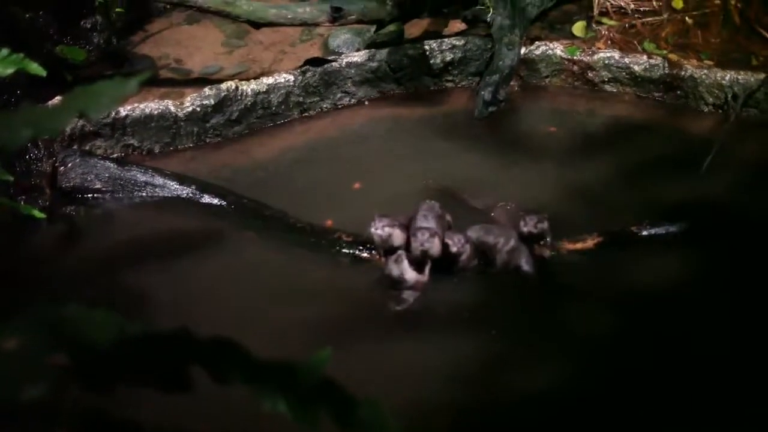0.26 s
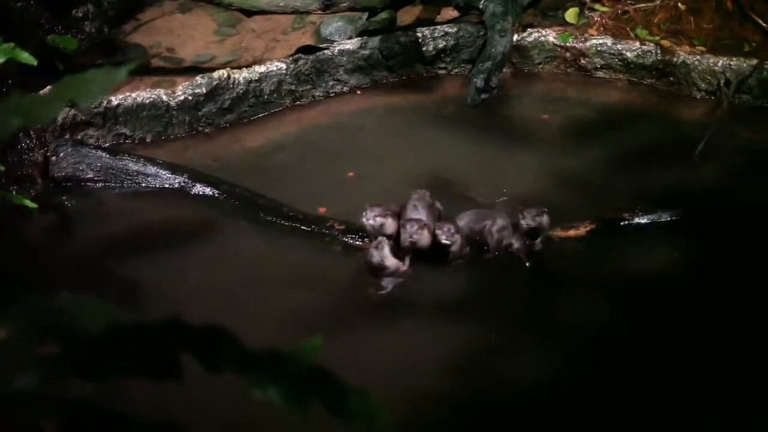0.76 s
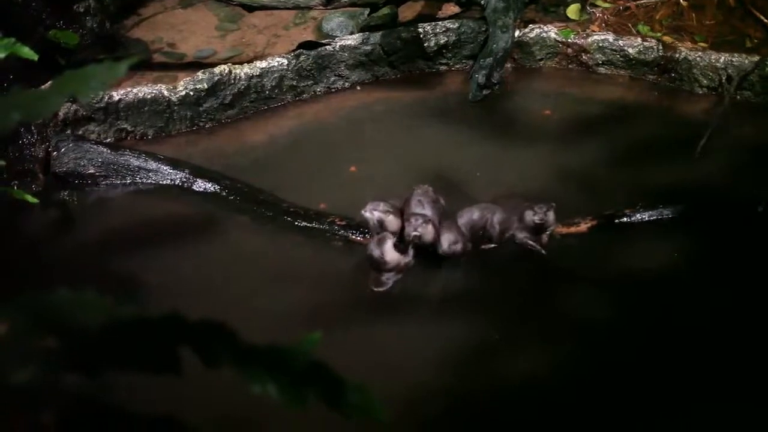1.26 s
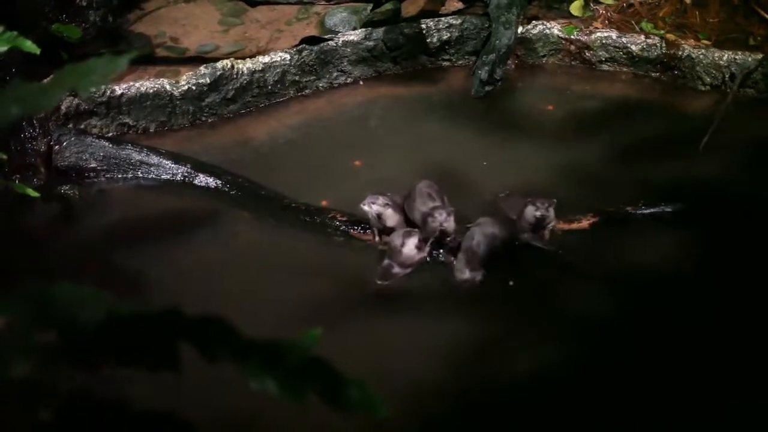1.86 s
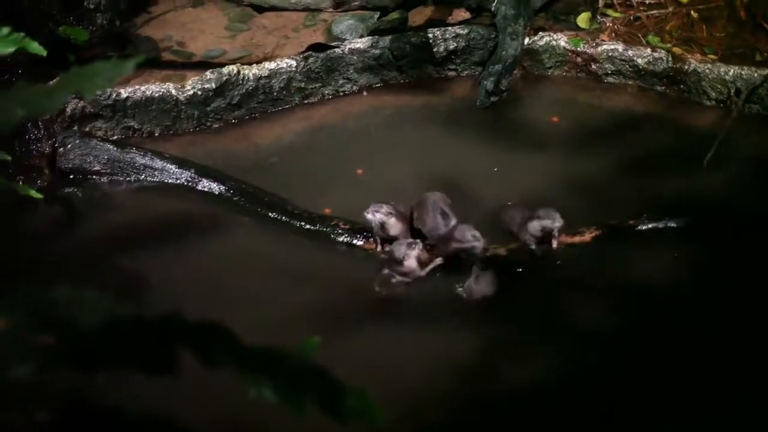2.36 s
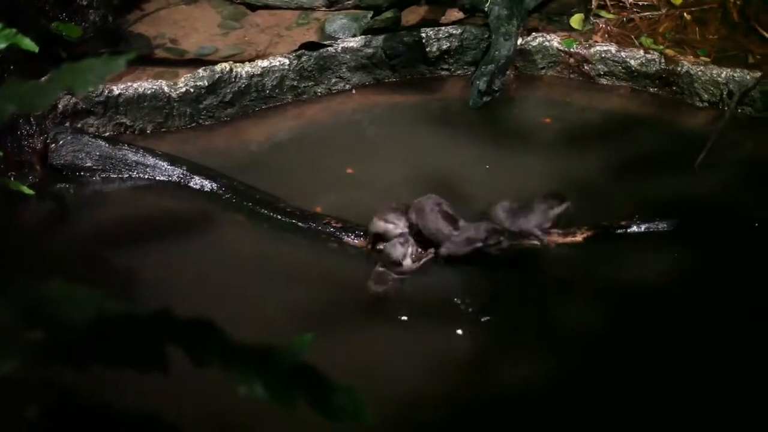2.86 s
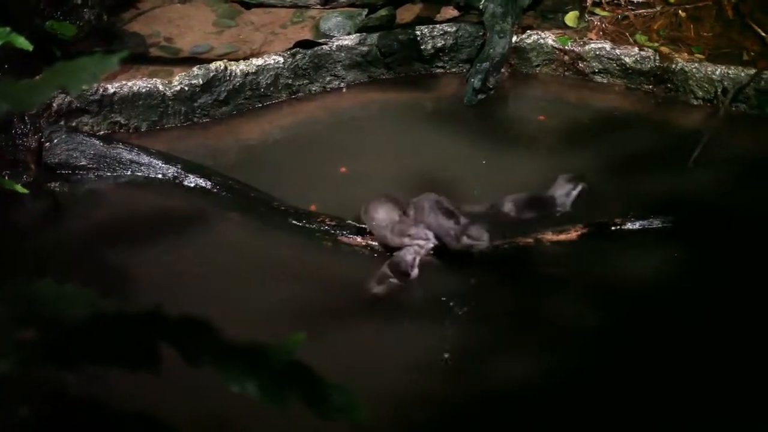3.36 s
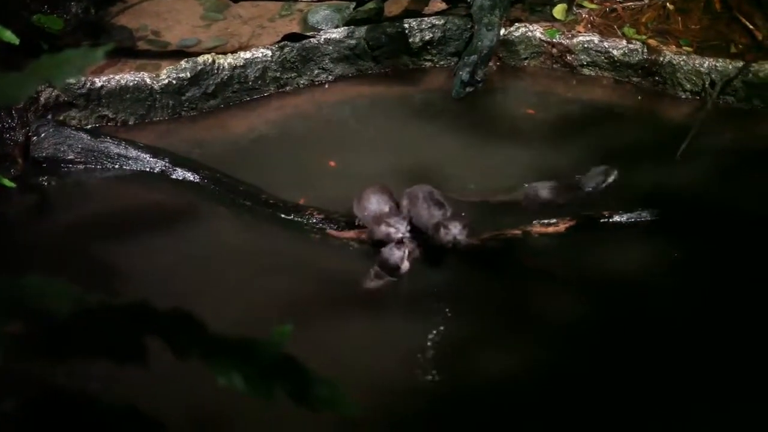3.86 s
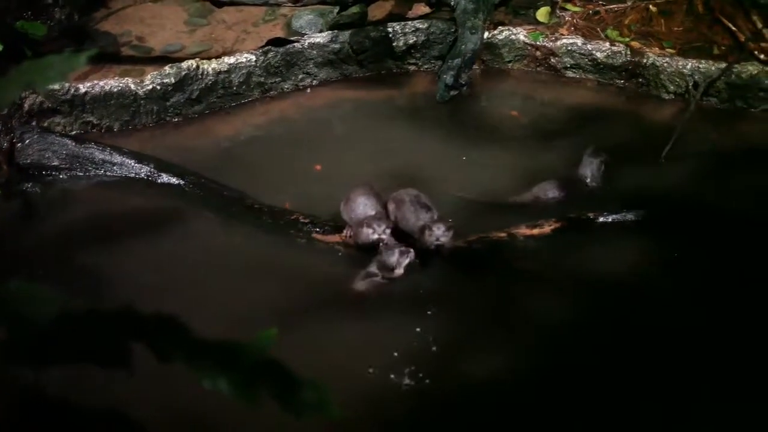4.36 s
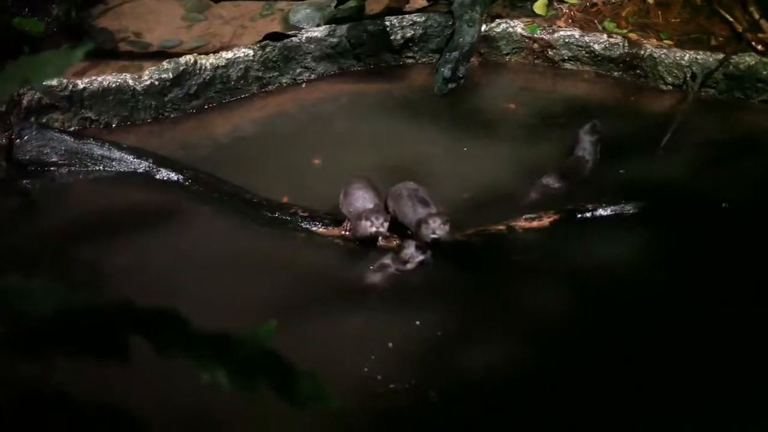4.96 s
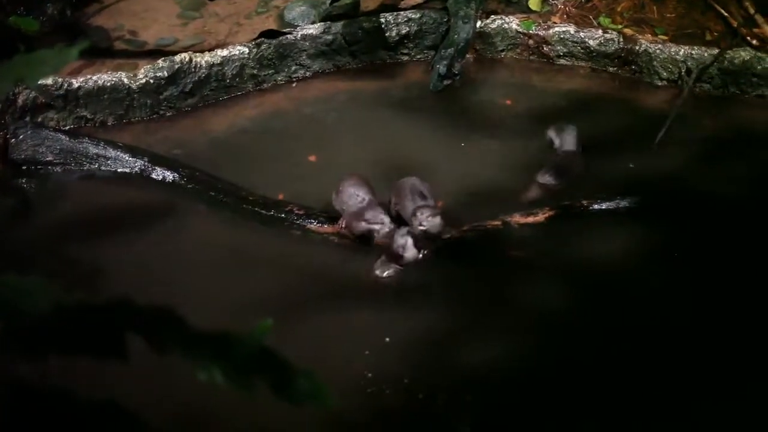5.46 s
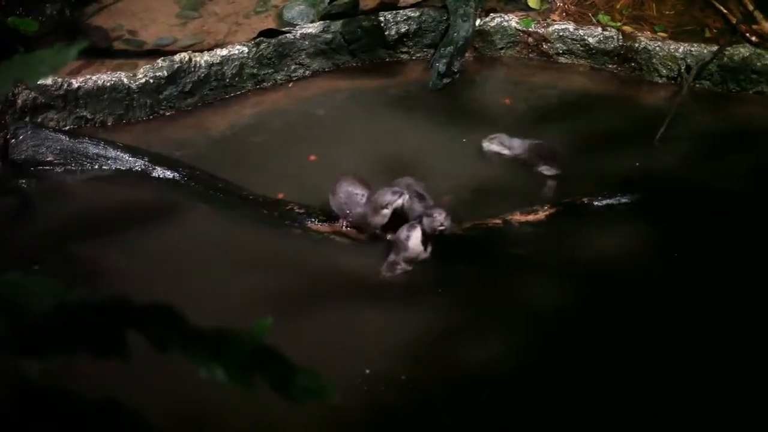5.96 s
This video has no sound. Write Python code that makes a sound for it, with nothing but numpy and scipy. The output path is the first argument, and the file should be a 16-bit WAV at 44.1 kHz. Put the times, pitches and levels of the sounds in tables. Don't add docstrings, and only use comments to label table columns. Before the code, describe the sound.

Otters squeal, whistle and growl in overlapping bursts over a steady high insect hiss, with small water drops and short pond echoes.

```python
import sys
import numpy as np
from scipy import signal
from scipy.io import wavfile
from scipy.ndimage import uniform_filter1d

SR = 44100
rng = np.random.default_rng(int(sys.argv[2]) if len(sys.argv) > 2 else 0)


def waveform_to_disk(signal):
    frames = np.transpose(np.atleast_2d(signal))
    scaled = np.clip(frames, -1, 1) * 32767
    samples = np.round(scaled).astype(np.int16)
    wavfile.write(sys.argv[1], SR, samples)


def invert_db(x):
    u = np.asarray(x, float) / 20
    return 10 ** u


N = 274302


def evened(x):
    return x / np.sqrt(np.mean(abs(x) ** 2) + 1e-20)


def read(points, hz):
    f, value = np.transpose(points)
    return np.interp(np.log(hz + 1), np.log(f + 1), value)


def add(mix, s, sound):
    part = mix[round(s * SR):][:len(sound)]
    part += sound[:len(part)]


def wander(shape, samples):
    noise = uniform_filter1d(rng.standard_normal(shape), int(samples))
    return evened(uniform_filter1d(noise, int(samples)))


def fuzzy_tone(hz, width, db):
    r = np.exp(-np.pi * width / SR)
    white = rng.standard_normal(N) + 1j * rng.standard_normal(N)
    slow = signal.lfilter([1], [1, -2 * r, r * r], white)
    carrier = np.exp(2j * np.pi * hz * np.arange(N) / SR)
    return invert_db(db) * evened((slow * carrier).real)


# (frequency [Hz], density [dB per Hz])
NIGHT_SPECTRUM = [(15, -51), (25, -35.5), (93, -4.5), (290, -9.5), (560, -12), (850, -10.5), (1800, -11.5),
                  (3400, -11.5), (5300, -10.5), (6750, -1.5), (9500, -20), (12000, -35), (15700, -39.5),
                  (17000, -88.5)]
# (frequency [Hz], width [Hz], level [dB])
INSECTS = (6800, 440, -44)
PUMP_HUM = (93, 9, -58)
# (time [s], gain change [dB])
GAIN_DUCKS = [
    (.63, 1.5),
    (1.103, -16.5),
    (2.166, -7.5),
    (3.356, -9.5),
    (5.224, -10.5),
]
HISS_DB, DUCK_S, RECOVER_S = -39.5, .035, 0.73


def night():
    frames, hz = N // 256 + 5, np.fft.rfftfreq(1024, 1 / SR)
    a, b, patches = rng.standard_normal((frames, 513, 3)).T
    patches = evened(uniform_filter1d(uniform_filter1d(patches, 12, 0), 10, 1))
    z = (a + 1j * b) * invert_db(read(NIGHT_SPECTRUM, hz)[:, None] + 1.24 * patches)
    hiss = invert_db(HISS_DB) * evened(signal.istft(z, nperseg=1024, noverlap=768)[1][:N])
    insects = fuzzy_tone(*INSECTS) * invert_db(2.6 * wander(N, 150))
    duck_s, duck_db = np.transpose(GAIN_DUCKS)
    since = np.arange(N) / SR - duck_s[:, None]
    ducks = np.clip(since / DUCK_S + .5, 0, 1) * np.exp(-np.maximum(since, 0) / RECOVER_S)
    return (hiss + insects + fuzzy_tone(*PUMP_HUM)) * invert_db(duck_db @ ducks)


# (time [s], peak level [dB], frequency [Hz], t60 [s])
DROPS = [(.01, -34, 1650, 0.036), (0.04, -19, 1670, 0.02), (.051, -19, 1500, 0.0062),
         (0.353, -23.5, 3860, 0.012), (.369, -28, 1710, 0.0094), (0.477, -23, 6650, 0.015),
         (1.557, -62, 1500, 0.012), (2.055, -38.5, 1360, 0.06), (3.036, -32, 1400, 0.018),
         (4.062, -28, 1590, .026), (4.092, -33, 1640, .025), (4.137, -36.5, 833, 0.064),
         (4.441, -36, 8100, 0.013), (5.002, -27.5, 1800, 0.018)]


def drops():
    mix, t = np.zeros(N), np.arange(3000) / SR
    for s, db, hz, t60 in DROPS:
        ring = np.sin(2 * np.pi * hz * t * (1 + 2.7 * t))
        ring = ring * invert_db(-60 * t / max(t60, .005)) * np.minimum(t / 0.00033, 1)
        tick = 0.13 * rng.standard_normal(len(t)) * invert_db(-60 * t / 0.014)
        add(mix, s, invert_db(db) * (ring + tick))
    return mix


# (frequency [Hz], t60 [s])
POND_DECAY = [(500, 0.039), (2000, 0.27), (3500, 0.76), (5000, 0.75), (9000, 0.044)]


def pond(x):
    taps = np.zeros(SR // 2)
    at = np.arange(300, SR // 2 - 20, 20)
    taps[at + rng.integers(0, 20, len(at))] = rng.choice([-1., 1.], len(at))
    hz, t, z = signal.stft(taps, SR, nperseg=256)
    decay = invert_db(-60 * t / read(POND_DECAY, hz)[:, None])
    tail = signal.istft(z * decay, SR, nperseg=256)[1]
    return signal.fftconvolve(x, tail / np.linalg.norm(tail))[:N]


def throat(modes, hz, mouth):
    return sum(invert_db(db) / (1 + 2j * (hz - f * mouth) / width) ** 2 for f, width, db in modes)


# (frequency [Hz], level [dB])
MICROPHONE = [(20, -3.5), (8150, 1.5), (8500, -9), (10000, -13.5), (12000, -36), (16000, -36)]


def voice(rough, rows, modes, top_hz, jitter, thin_db, rise_s, falter_db, flutter_s=.0003):
    s, *columns = np.transpose(rows)
    t = np.arange(s[0], s[-1], 1 / SR)
    hz, level_db, mouth, tilt_db = (np.interp(t, s, c) for c in columns)
    hz = uniform_filter1d(hz, 500, mode="nearest")
    order = np.arange(1, top_hz // hz.min() + 1)[:, None]
    turns = np.cumsum(hz * (1 + jitter * wander(len(t), 105))) / SR
    over_hz = order * hz[::8]
    slope_db = tilt_db[::8] * np.log2(over_hz / 3000) - thin_db * np.maximum(order - 2, 0)
    colour = throat(modes, over_hz, mouth[::8]) * invert_db(slope_db + read(MICROPHONE, over_hz))
    colour = colour * (over_hz < top_hz)
    power = (abs(colour) ** 2).sum(0) / 2
    colour = colour / np.sqrt(uniform_filter1d(power, 220, mode="nearest"))
    rough = np.clip(rough * (over_hz / 3000) ** .7 * (hz.max() / hz[::8]) ** 1.1, 0, 1)
    patches = evened(uniform_filter1d(wander(colour.shape, 110), size=2, axis=0))
    colour = colour * invert_db(falter_db * patches)
    colour, rough = (np.repeat(c, 8, axis=1)[:, :len(t)] for c in (colour, rough))
    flutter_samples = max(SR / hz.mean() / 1.6, SR * flutter_s) + 2
    smear = wander((2, len(order), len(t)), flutter_samples)
    folds = np.sqrt(1 - rough ** 2) + rough * (smear[0] + 1j * smear[1]) / np.sqrt(2)
    sound = (colour * folds * np.exp(2j * np.pi * order * turns)).real.sum(0)
    edge = np.clip(np.minimum(t - s[0], (s[-1] - t) / 3) / rise_s, 0, 1)
    return s[0], invert_db(level_db) * edge * sound


def chorus(calls, modes, **folds):
    mix = np.zeros(N)
    for rough, rows in calls:
        add(mix, *voice(rough, rows, modes, **folds))
    return mix


SHUT_PER_OCTAVE, BRIGHTER_DB = 0.039, 2.5


def pressed(rows, rough, mouth, tilt_db):
    s, hz, db = np.transpose(rows)
    fall = np.log2(hz.max() / hz)
    mouth, tilt_db = mouth - SHUT_PER_OCTAVE * fall, tilt_db + BRIGHTER_DB * fall
    return rough, np.transpose([s, hz, db, mouth, tilt_db])


# (time [s], pitch [Hz], level [dB])
PEEP = [(0.082, 1040, -30), (0.11, 1019, -28), (0.17, 1258, -24.5), (0.198, 1280, -21.5),
        (0.236, 1256, -26.5), (0.248, 1190, -52)]
# (roughness [0-1], mouth opening [factor], tilt [dB per octave])
PEEP_VOICE = (0.037, 1.01, -0.38)
# (frequency [Hz], width [Hz], level [dB])
PEEP_THROAT = [(1250, 460, 1), (2310, 105, 1.5), (2590, 110, -14), (3404, 120, 6.5), (3770, 160, -10),
               (4280, 420, -1.5)]


def peep():
    return chorus([pressed(PEEP, *PEEP_VOICE)], PEEP_THROAT,
                  top_hz=9000, jitter=.002, thin_db=.1, rise_s=.002, falter_db=1.2)


def glide(start, length, top_hz, end_hz, db, steady, bend, peak, start_db, end_db):
    u = np.linspace(0, 1, 25)
    hz = top_hz + (end_hz - top_hz) * (steady * u + (1 - steady) * u ** bend)
    level_db = db + np.interp(u, [0, peak, 1], [start_db, 0, end_db])
    return np.transpose([start + length * u, hz, level_db])


def glides(rows, shape, tone):
    return [pressed(glide(*row, *shape), *tone) for row in rows]


# (frequency [Hz], width [Hz], level [dB])
THROAT = [(1680, 320, -12), (2950, 600, 0), (5050, 900, 2), (6500, 650, -4), (7800, 1000, -8),
          (10000, 1500, -15)]
# (time [s], pitch [Hz], level [dB], tilt [dB per octave])
WHISTLE = [(0.535, 3504, -40, 6), (0.558, 3669, -20.5, 27), (0.579, 3696, -13.5, 28),
           (0.63, 3326, -12.5, 8), (0.654, 3080, -23, 2), (0.668, 2472, -23, 0.5),
           (0.681, 2207, -17.5, -11.5), (0.703, 2020, -33.5, -12), (0.741, 1420, -22.5, 11)]
WHISTLE_VOICE = (0.057, 0.897)
# (start [s], length [s], top pitch [Hz], end pitch [Hz], level [dB])
HUSKS = [
    (2.5, 0.17, 2800, 2650, -28),
    (4.12, 0.25, 3550, 3350, -40),
    (0.31, 0.051, 5100, 5500, -30.5),
    (3.04, 0.3, 5600, 5250, -30),
    (2.69, 0.22, 5400, 4700, -30.5),
]
PIPS = [
    (.553, 0.039, 3066, 2650, -23),
    (.665, .095, 1224, 600, -43),
    (1.285, 0.057, 2515, 1934, -31),
    (3.35, 0.12, 1005, 693, -46.5),
    (4.208, .08, 2520, 1910, -36),
    (4.235, .095, 1077, 790, -37),
]
PLUNGES = [
    (2.31, 0.078, 3110, 1878, -29.5),
    (3.16, 0.16, 3820, 1876, -22),
    (4.06, 0.17, 3670, 2150, -22),
]
RASPS = [
    (.695, 0.1, 2450, 2215, -29),
    (1.34, .1, 1126, 823, -42),
    (4.203, 0.11, 2440, 1813, -30.5),
]
# (steady droop [0-1], bend [power], peak [0-1 of length], start [dB], end [dB])
HUSK_SHAPE = (-0.56, 0.9, 0.2, -9, -11)
PIP_SHAPE = (-0.1, 0.94, 1, -7, -12)
PLUNGE_SHAPE = (.16, 4.5, .4, -10, -20)
RASP_SHAPE = (-0.6, 1, 0.34, -3, -15)
# (roughness [0-1], mouth opening [factor], tilt [dB per octave])
HUSK_VOICE = (.8, 1.01, -10)
PIP_VOICE = (0.12, 0.54, -18)
PLUNGE_VOICE = (0.15, 0.97, 2)
RASP_VOICE = (.6, .97, 9)


def whistles():
    husks = chorus(glides(HUSKS, HUSK_SHAPE, HUSK_VOICE), THROAT, top_hz=12500, jitter=.012,
                   thin_db=5., rise_s=.02, falter_db=1.2, flutter_s=.0016)
    rough, mouth = WHISTLE_VOICE
    calls = [(rough, np.insert(np.array(WHISTLE), 3, mouth, axis=1))]
    calls += glides(PIPS, PIP_SHAPE, PIP_VOICE)
    calls += glides(PLUNGES, PLUNGE_SHAPE, PLUNGE_VOICE)
    calls += glides(RASPS, RASP_SHAPE, RASP_VOICE)
    return husks + chorus(calls, THROAT, top_hz=12500, jitter=.008, thin_db=5., rise_s=.008, falter_db=3.2)


# (time [s], pitch [Hz], level [dB])
SQUEALS = [
    [(0.812, 873, -44.5), (0.83, 1405, -31), (0.84, 1595, -35.5), (0.876, 1079, -22.5), (0.938, 911, -29.5),
     (1.024, 768, -27.5), (1.09, 775, -27.5)],
    [(1.038, 1663, -19), (1.058, 1661, -12.5), (1.098, 1517, -12.5), (1.122, 1365, -18.5),
     (1.146, 1166, -26), (1.234, 692, -32), (1.262, 657, -43), (1.31, 595, -27)],
    [(2.124, 1624, -13), (2.136, 1619, -19), (2.178, 1637, -13.5), (2.219, 1424, -17.5), (2.233, 1282, -19),
     (2.291, 919, -24), (2.361, 628, -29), (2.4, 591, -26)],
    [(3.297, 1700, -25), (3.305, 1620, -17.5), (3.35, 1335, -14), (3.372, 1246, -20), (3.431, 924, -20.5),
     (3.537, 652, -27), (3.555, 610, -29.5), (3.63, 558.4, -45)],
]
# (time [s], pitch [Hz], level [dB])
ARCHED_SQUEAL = [(5.01, 678, -43), (5.06, 771, -24), (5.1, 1039, -22), (5.135, 1424, -15.5),
                 (5.164, 1359, -14.5), (5.195, 1430, -12), (5.229, 1165, -17.5), (5.33, 788, -21),
                 (5.49, 551, -36)]
# (mouth opening [factor], tilt [dB per octave])
SQUEAL_VOICES = [(.92, -4), (1.01, -2), (1.01, -2), (.99, 1.5), (1.01, 2)]
SQUEAL_ROUGH = (.2, .05, .05, .08, .06)


def squeals():
    curves = SQUEALS + [ARCHED_SQUEAL]
    calls = [pressed(c, rough, *tone) for c, rough, tone in zip(curves, SQUEAL_ROUGH, SQUEAL_VOICES)]
    return chorus(calls, THROAT, top_hz=11200, jitter=.006, thin_db=.1, rise_s=.003, falter_db=3.2)


# (time [s], pulse rate [Hz], level [dB])
GROWLS = [
    [(2.29, 328, -31.5), (2.5, 282, -26.5), (2.64, 280, -29), (2.74, 240, -29)],
    [(5.36, 367, -21), (5.49, 290, -22.5), (5.836, 236, -23.5), (5.96, 268, -20.5), (6.1, 243, -25.5),
     (6.3, 287, -12)],
]
# (mouth opening [factor], tilt [dB per octave])
GROWL_VOICES = [(0.929, 1), (1.011, 0.5)]
GROWL_ROUGH = (.45, .32)
# (frequency [Hz], width [Hz], level [dB])
GROWL_THROAT = [(3120, 473, -2), (3710, 670, -5.5), (4850, 1020, 1.5), (5620, 810, -2.5),
                (7750, 1290, -4.5)]


def growls():
    calls = [pressed(c, rough, *tone) for c, rough, tone in zip(GROWLS, GROWL_ROUGH, GROWL_VOICES)]
    return chorus(calls, GROWL_THROAT, top_hz=8200, jitter=.011, thin_db=.01, rise_s=.04, falter_db=1.2)


# (time [s], pitch [Hz], level [dB])
MOANS = [
    [(2.62, 737, -43), (2.7, 740, -40), (2.922, 705.6, -33.5), (3.04, 669.4, -29), (3.222, 648, -34.5),
     (3.312, 624, -29), (3.37, 625, -22)],
    [(5.3, 966, -39), (5.33, 946, -34.5), (5.42, 838, -34.5), (5.464, 800.7, -27.5), (5.68, 641, -35),
     (5.76, 626.5, -37.5), (5.944, 609.4, -31), (6.07, 575, -25.5), (6.11, 520.6, -22)],
]
# (roughness [0-1], mouth opening [factor], tilt [dB per octave])
MOAN_VOICES = [(0.16, 1.066, 1.2), (0.38, 0.968, 4.5)]
# (frequency [Hz], width [Hz], level [dB])
MOAN_THROAT = [(726, 350, -13), (2103, 390, 2.5), (2830, 73, -1.5), (3508, 130, 0.5), (4792, 930, -10),
               (8300, 2600, -22)]
# (start [s], end [s], level [dB], roughness [0-1], tilt [dB per octave])
THIRDS = [
    (2.4, 3.3, -36.5, 0.6, 4),
    (2.66, 2.93, -31.5, 0.55, 9),
    (3.03, 3.33, -29.5, 0.5, 8),
]
THIRDS_MOUTH, THIRDS_EDGE_DB = 1.049, -4.5


def moans():
    calls = [pressed(c, *tone) for c, tone in zip(MOANS, MOAN_VOICES)]
    s, hz, _ = np.transpose(MOANS[0])
    for start, end, db, rough, tilt_db in THIRDS:
        t = np.linspace(start, end, 20)
        level_db = db + THIRDS_EDGE_DB * np.cos(np.pi * (t - start) / (end - start)) ** 2
        curve = np.transpose([t, np.interp(t, s, hz) / 3, level_db])
        calls.append(pressed(curve, rough, THIRDS_MOUTH, tilt_db))
    return chorus(calls, MOAN_THROAT, top_hz=9000, jitter=.005, thin_db=.01, rise_s=.025, falter_db=1.2)


ECHO_DB, WHISTLE_ECHO_DB = -19, -15


def scene():
    background = night()
    near = drops() + peep() + squeals() + growls() + moans()
    far = whistles()
    echoes = pond(invert_db(ECHO_DB) * near + invert_db(WHISTLE_ECHO_DB) * far)
    return (near + far + echoes + background)[None]


# (frequency [Hz], level under the mean [dB])
MASK = [(8150, -70), (8300, -13), (8950, -16), (9400, -23), (10500, -33), (12000, -43), (16000, -48)]


def masked_treble(dry):
    hz, _, z = signal.stft(dry, SR, nperseg=1024)
    power = uniform_filter1d(abs(z) ** 2, 3, 2)
    band = np.repeat(power[:, :512].reshape(1, 32, 16, -1).mean(2), 16, 1)
    mean_power = power[:, :200].mean(1, keepdims=True)
    kept = band > mean_power * invert_db(2 * read(MASK, hz[:512]))[:, None]
    kept = np.concatenate([kept, kept[:, :1]], 1)
    return signal.istft(z * kept, SR, nperseg=1024)[1][:, :N]


def band_limit(x):
    return signal.sosfilt(signal.butter(12, 15780, fs=SR, output="sos"), x)


def record(dry):
    mix = masked_treble(dry)
    return band_limit(mix)


dry = scene()
out = record(dry)
waveform_to_disk(out)
```